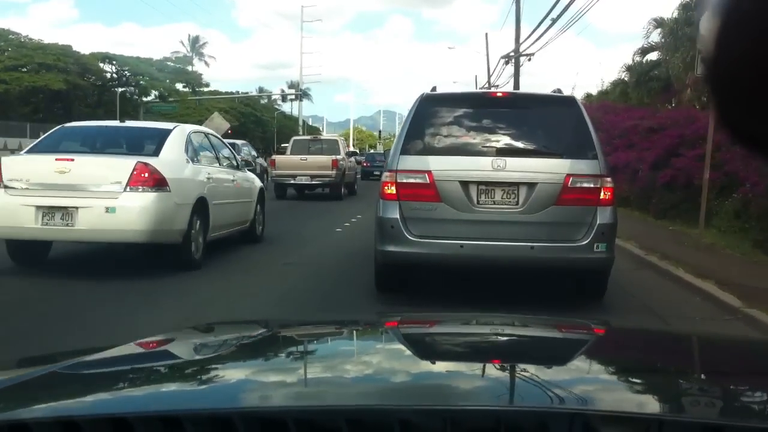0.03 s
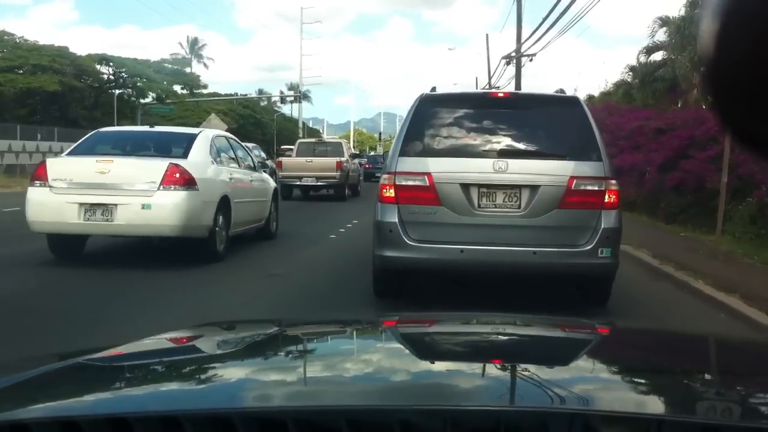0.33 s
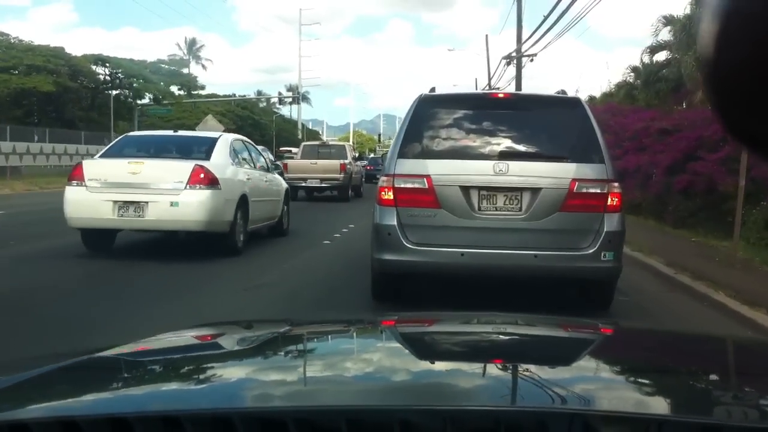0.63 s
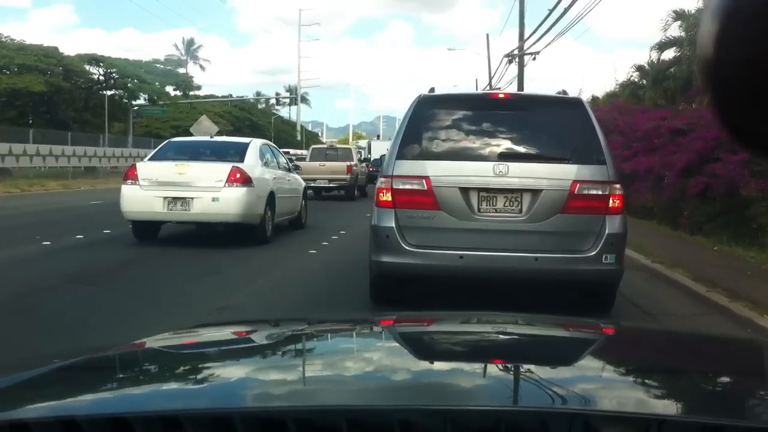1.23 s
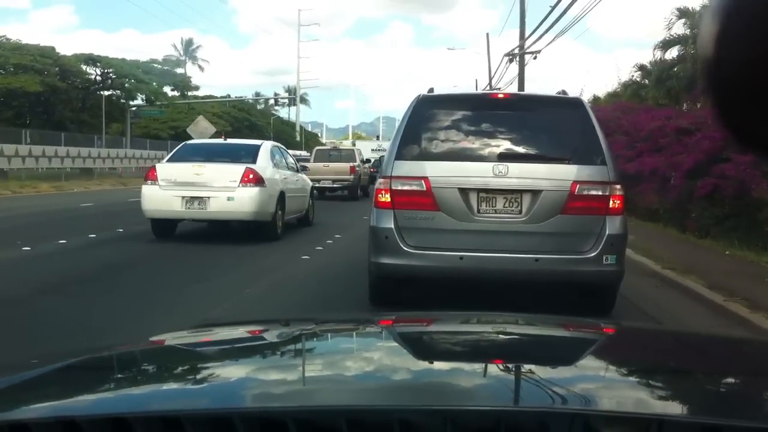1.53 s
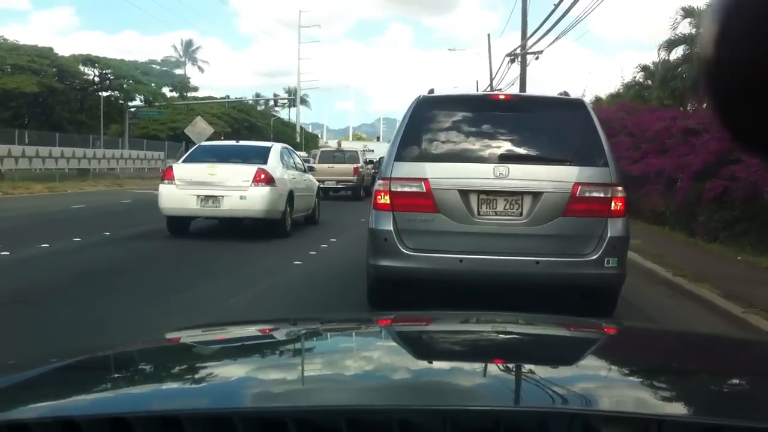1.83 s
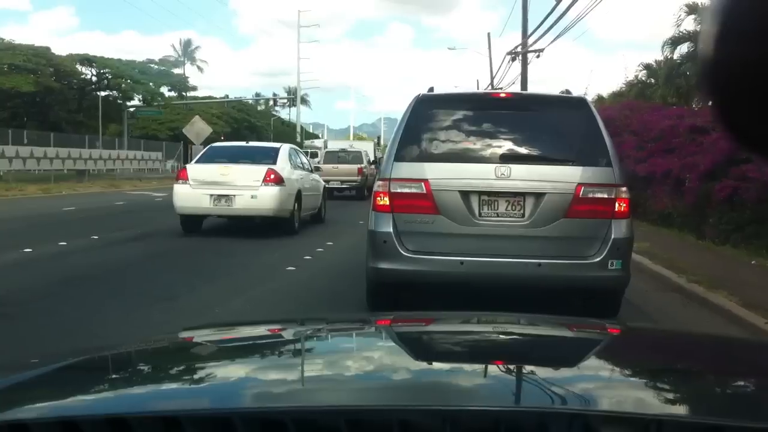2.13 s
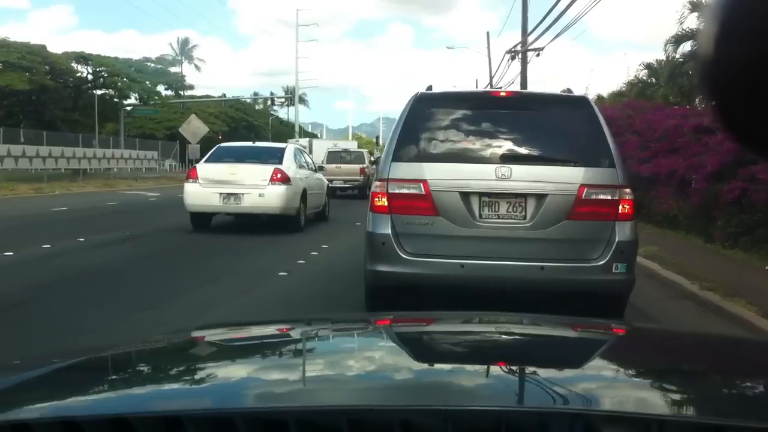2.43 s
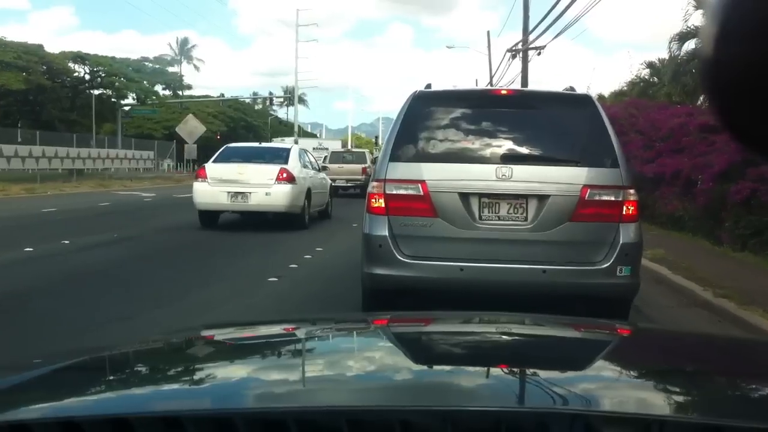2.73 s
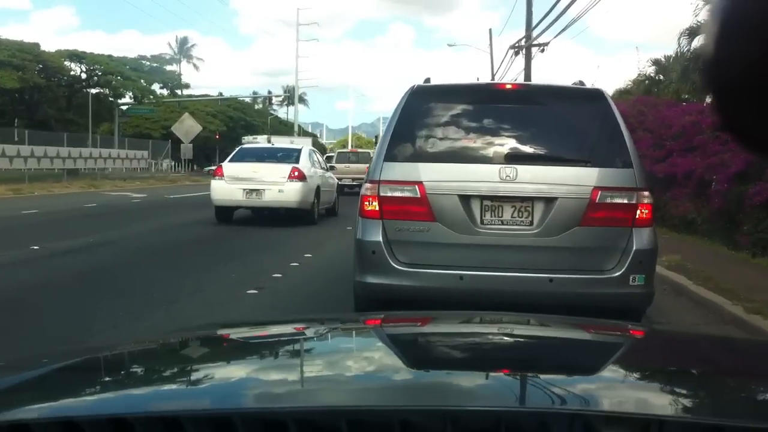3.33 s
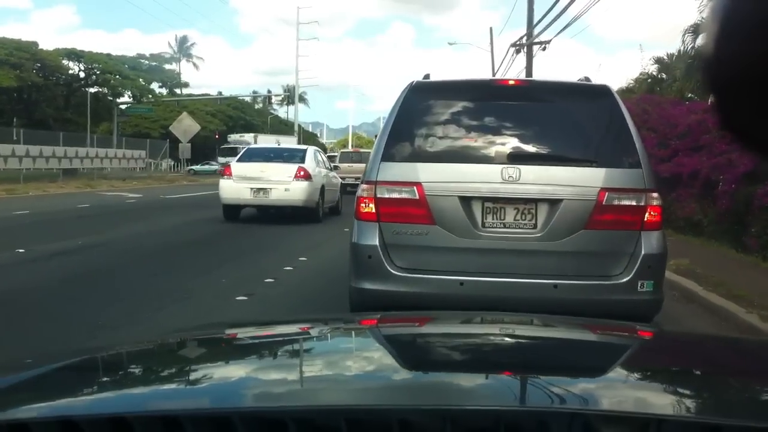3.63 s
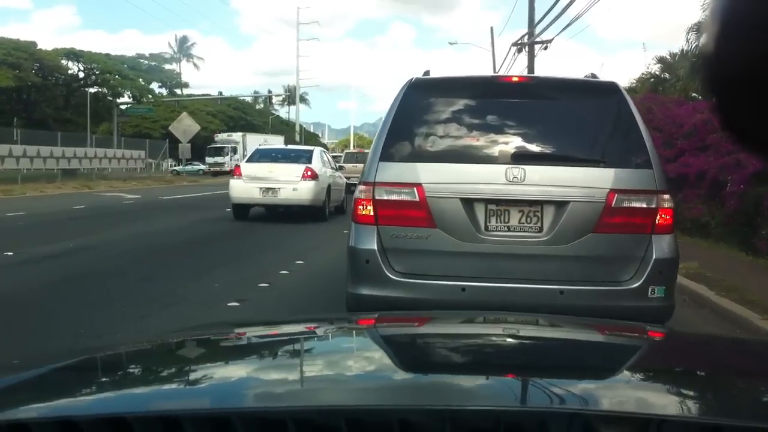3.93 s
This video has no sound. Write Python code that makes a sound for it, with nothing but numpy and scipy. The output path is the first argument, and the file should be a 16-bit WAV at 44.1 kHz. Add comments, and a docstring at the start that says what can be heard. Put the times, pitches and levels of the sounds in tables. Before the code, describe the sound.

Deep, throbbing engine and exhaust rumble inside a creeping car, with a few soft pops.

```python
"""Inside a car in slow traffic, one microphone behind the windscreen, a big eight-cylinder engine creeping.
From the start its uneven exhaust pulses boom in the pipes and cabin, over a low road rumble.
After half a second the throttle is eased and the exhaust pops; just past one second it picks up again.
From two seconds on, tyres outside swell past with thin hiss and a breathy whistle; three more pops follow.
The last second brings two faint brake squeals and most of the small rattles of the trim."""
import sys
import numpy as np
from scipy import signal
from scipy.fft import rfft, irfft
from scipy.io import wavfile
from scipy.ndimage import uniform_filter1d

SR = 44100
rng = np.random.default_rng(int(sys.argv[2]) if len(sys.argv) > 2 else 0)


def store_pcm(level_fs):
    """Save levels as 16-bit WAV."""
    pcm = np.round(np.clip(level_fs, -1, 1) * 32767).astype(np.int16)
    wavfile.write(sys.argv[1], SR, np.atleast_2d(pcm).T)


N = 176400
T = np.arange(N) / SR

# Engine speed. Each row: time in seconds, firings per second.
FIRING_RATE = [(0, 71.3), (.15, 70.7), (.44, 70), (.6, 66.5), (.8, 64.6), (1.0, 52), (1.15, 54.6),
               (1.3, 59), (1.52, 60.3), (1.7, 53.2), (1.88, 54), (2.03, 61.5), (2.25, 60.2), (2.55, 56.6),
               (3.2, 58.5), (3.6, 63), (4, 62.7)]
# How steadily the engine pulls. Each row: time in seconds, clean tone's share of the boom from 0 to 1.
STEADY_PULL = [(0, 0.51), (.3, 0.63), (.5, 0.61), (.62, 0.23), (1.05, 0.01), (1.2, 0.57), (1.5, 0.31),
               (1.62, 0.12), (1.82, 0.55), (2.05, 0.17), (3.0, 0.17), (3.2, 0.33), (4, 0.1)]
# The eight firings of a cycle. Each entry: relative strength in dB.
FIRING_STRENGTH = [2, -2, 2.5, -2, -1, 2.5, 4, -5]
# Their uneven timing. Each entry: lateness in firing intervals.
FIRING_LAG = [0.0019, 0.194, -0.143, 0.121, -0.1954, 0.034, .22, -0.151]
# Hum at the firing rate. Each row: time in seconds, relative level in dB.
HUM_LEVEL = [(0.02, -43.5), (0.6, -33.5), (0.8, -38), (0.85, -51), (1.1, -53), (1.46, -38), (1.64, -54),
             (2.05, -40), (2.09, -50), (2.19, -37), (2.37, -45), (2.39, -54), (2.5, -43), (3.28, -46.5),
             (3.69, -35.5), (3.85, -50), (3.88, -37), (3.98, -49)]
# The exhaust's low boom and the growl above it. Each row: time in seconds, relative level in dB.
BOOM_LEVEL = [(0.02, -19), (0.46, -17), (0.61, -24.5), (0.69, -28.5), (0.71, -17.5), (0.77, -27),
              (0.81, -20.5), (0.95, -28.5), (0.97, -21.5), (1.09, -42), (1.12, -24), (1.27, -18),
              (1.33, -23.5), (1.57, -21), (1.65, -34), (1.68, -21), (1.89, -25.5), (1.93, -19.5),
              (2.08, -26.5), (2.13, -18.5), (2.35, -26.5), (2.48, -19), (2.51, -28), (2.6, -20.5),
              (2.9, -24.5), (2.94, -19), (3.02, -35), (3.05, -15.5), (3.07, -23), (3.21, -19.5),
              (3.23, -24.5), (3.43, -20.5), (3.48, -31), (3.5, -24.5), (3.64, -19.5), (3.69, -26),
              (3.76, -18.5), (3.82, -27), (3.85, -18), (3.98, -22)]
GROWL_LEVEL = [(0.02, -24.5), (0.29, -23.5), (0.68, -29.5), (0.71, -22.5), (0.86, -36), (0.97, -29.5),
               (1.12, -43.5), (1.17, -23), (1.21, -34.5), (1.27, -23.5), (1.68, -31), (1.72, -25),
               (1.84, -35), (2.23, -23.5), (2.25, -30.5), (2.52, -37.5), (2.55, -27), (3.07, -30),
               (3.16, -29), (3.22, -35), (3.25, -25.5), (3.98, -35.5)]
# Bark and rasp rise with the throttle. Each row: time in seconds, bark and rasp in relative dB.
BARK_RASP_LEVEL = [(0.02, -27, -38.5), (0.05, -34, -38), (0.35, -28.5, -29), (0.61, -38, -42),
                   (0.7, -32, -33.5), (1.1, -46, -50.5), (1.21, -37, -37), (1.45, -29, -31.5),
                   (1.62, -40.5, -40.5), (1.86, -41, -46), (1.98, -31, -31), (2.03, -36, -44.5),
                   (2.16, -31.5, -33), (2.39, -38.5, -42.5), (2.58, -27.5, -34.5), (2.62, -35.5, -45),
                   (2.68, -31, -37.5), (2.98, -28, -35), (3.05, -46, -42.5), (3.1, -27, -33.5),
                   (3.35, -37.5, -42.5), (3.44, -27, -30.5), (3.58, -34.5, -48.5), (3.64, -27.5, -33),
                   (3.92, -34, -42), (3.98, -28, -35.5)]
# Resonances of pipes and cabin, low to high. Each row: centre in Hz, width in Hz, relative level in dB.
BOOM_RESONANCES = [(120.4, 60, -9.5), (143.3, 35.5, -0.5), (169, 19, -1.5), (190.3, 33.7, -9)]
GROWL_RESONANCES = [(261.5, 32, -0.68), (288.6, 21.5, -2.3)]
BARK_RESONANCES = [(227.3, 29, 0), (320.4, 28.5, 1.5), (349.8, 44, -5.5), (378.8, 25, -11.5)]
RASP_RESONANCES = [(404.5, 56, -6.5), (447, 38.4, 1), (505.8, 66, -4)]
# Gas noise that passes the muffler. Each row: frequency in Hz, relative level in dB.
GAS_SPECTRUM = [(300, -5), (520, -0.5), (700, 2), (900, -4.5), (1150, -12), (1700, -19.5), (3000, -26),
                (8000, -41)]
# Single harder firings. Each row: start in seconds, peak in dB ahead of the muffler's filtering.
EXHAUST_POPS = [(.709, -9.5), (2.542, -14), (3.087, -14), (3.267, -15)]
# The ring of a pop. Each row: frequency in Hz, relative level in dB, seconds to fall by 60 dB.
POP_RING = [(150, -13, 0.044), (273, -3, 0.093), (346, 1, 0.06), (450, -5.5, 0.037)]
EXHAUST_LOW_HZ, EXHAUST_HIGH_HZ, POP_TOP_HZ = 100, 594, 504

# Traffic outside, heard from within. Each row: time in seconds, tyre roar and hiss in relative dB.
TRAFFIC_LEVEL = [(0.03, -50, -66), (0.15, -50.5, -61.5), (0.81, -50.5, -63), (1.07, -53, -69.5),
                 (1.21, -49, -60), (1.51, -47.5, -57.5), (1.6, -47, -62), (1.61, -50.5, -60.5),
                 (2.13, -46, -53.5), (2.62, -47, -53), (2.7, -43.5, -52.5), (3.23, -44.5, -55),
                 (3.3, -46, -56), (3.45, -42, -54), (3.57, -46.5, -59), (3.62, -42, -52.5),
                 (3.84, -47, -58.5), (3.86, -44, -54.5), (3.94, -48.5, -59), (3.97, -47.5, -56.5)]
# Tyre roar, hiss and road rumble in the cabin. Each row: frequency in Hz, relative level in dB.
ROAR_SPECTRUM = [(300, -12.5), (600, 0), (760, -3), (900, 3.5), (1030, -3), (1200, 1.5), (1400, -3),
                 (1540, -7), (1700, -4.5), (1950, -15), (2100, -10.5), (2300, -18), (2420, -13),
                 (2550, -24.5), (2670, -18), (3300, -24.5), (6000, -52.5)]
HISS_SPECTRUM = [(1200, -1.5), (2600, 0.5), (3600, -.5), (5200, -0.5), (6300, -3), (7400, -2.5), (8400, -5),
                 (10000, -4), (12000, -7), (14000, -11.5), (15800, -20)]
RUMBLE_SPECTRUM = [(15, -17), (30, -23), (42, -25), (60, 13), (90, 7.5), (200, 1.5), (500, -4),
                   (900, -34.5)]
# The singing of passing tread. Each row: time in seconds, centre in Hz, level in dB against the roar.
TREAD_BAND = [(0, 900.2, -10.5), (.8, 1000, -11), (1.35, 1189, -5.5), (2.3, 1230, -4.5), (2.7, 1050, -6),
              (3.0, 933.5, -6.5), (3.5, 944.6, -8), (4, 958, -14)]
# A thin whistle high in the hiss. Each row: time in seconds, relative level in dB.
WHISTLE_LEVEL = [(0, -104), (1.6, -90), (2.1, -64), (2.6, -62), (2.95, -59.5), (3.25, -63), (3.45, -74),
                 (3.6, -82), (4, -88)]
# Its two bands. Each row: centre in Hz, width in Hz, relative level in dB.
WHISTLE_BANDS = [(14560, 300, -3), (12700, 850, -4.5)]
# Faint brakes. Each row: start in seconds, end in seconds, pitch in Hz, average level in dB.
BRAKE_SQUEALS = [(3.139, 3.28, 14580, -64), (3.63, 3.78, 6625, -65)]
# Trim in the cabin, near the microphone. Each row: middle in seconds, length in seconds, level in dB.
TRIM_RATTLES = [(0.138, 0.032, -60), (0.793, .025, -64), (1.157, 0.017, -60), (1.24, 0.045, -60),
                (3.178, .03, -55.5), (3.345, 0.027, -59), (3.438, 0.043, -53.5), (3.51, 0.037, -54),
                (3.62, 0.023, -54), (3.692, 0.055, -53.5), (3.775, .025, -59), (3.968, 0.034, -56)]


def engine():
    """Lumpy exhaust in four registers, with clean tones at one, two and four times the firing rate."""
    rate, hum_db, boom_db, steady = in_time(FIRING_RATE, HUM_LEVEL, BOOM_LEVEL, STEADY_PULL)
    glide = int(.035 * SR) + 1
    growl_db, bark_db, rasp_db = uniform_filter1d(in_time(GROWL_LEVEL, BARK_RASP_LEVEL), glide)
    count = np.cumsum(rate) / SR
    drive = firings(count, steady)
    hum, second, fourth = (np.sqrt(2) * np.sin(2 * np.pi * (k * count + rng.random())) for k in (1, 2, 4))
    boom = np.sqrt(1 - steady) * pipe(drive, BOOM_RESONANCES) + np.sqrt(steady) * second
    boom = evened(boom, span_s=.065)
    growl = pipe(drive, GROWL_RESONANCES) + from_db(-13) * steady * resonate(fourth, 282, width_hz=70.4)
    bark = pipe(drive, BARK_RESONANCES)
    rasp = pipe(drive, RASP_RESONANCES) + from_db(-16) * coloured_noise(GAS_SPECTRUM)
    return (from_db(hum_db + .5) * hum + from_db(boom_db + 1.5) * boom + from_db(growl_db + .5) * growl
            + from_db(bark_db + 2.5) * bark + from_db(rasp_db - .5) * rasp)


def firings(count, steady):
    """One uneven pulse per cylinder, then a puff of turbulent gas; more regular under a steady pull."""
    firing = np.arange(int(count[-1]))
    cylinder = firing % len(FIRING_STRENGTH)
    looseness = 1 - .54 * steady
    jitter, misfire = rng.standard_normal((400, 2))[firing].T * np.interp(firing, count, looseness)
    start_s = np.interp(firing + np.array(FIRING_LAG)[cylinder], count, T) + .000866 * jitter
    strength = from_db(np.array(FIRING_STRENGTH)[cylinder] + 3.5 * misfire)
    pulses = np.zeros(N)
    pulses[np.clip((start_s * SR).astype(int), 0, N - 1)] = strength
    puffs = rng.standard_normal(N) * np.exp(1.83 * np.cos(2 * np.pi * count - 1))
    return rms_one(pulses) + .57 * looseness * rms_one(puffs)


def pipe(drive, resonances):
    """Pulses ring a group of resonances behind the muffler, at an even level."""
    run_in = SR // 4   # the pipes are already ringing at the start
    drive = np.concatenate([drive[run_in:2 * run_in], drive])
    ring = sum((-1) ** k * from_db(db) * resonate(drive, hz, width)
               for k, (hz, width, db) in enumerate(resonances))
    muffled = cut(cut(ring, EXHAUST_LOW_HZ, "high", order=6), EXHAUST_HIGH_HZ, "low", order=8)
    return evened(muffled, span_s=.13)[run_in:]


def exhaust_pops():
    """Now and then one firing hits harder and rings briefly through the muffler."""
    pops = np.zeros(N)
    for start, peak_db in EXHAUST_POPS:
        age = np.maximum(T - start, 0)
        ring = sum(from_db(db - np.minimum(60 * age / t60, 200)) * np.sin(2 * np.pi * hz * age)
                   for hz, db, t60 in POP_RING)
        pops += from_db(peak_db) * ring / np.abs(ring).max()
    return cut(cut(pops, EXHAUST_LOW_HZ, "high", order=4), POP_TOP_HZ, "low", order=8)


def road():
    """Tyres roar past outside over the road rumble; their hiss throbs slightly with the engine."""
    roar_db, hiss_db, rate = in_time(TRAFFIC_LEVEL, FIRING_RATE)
    throb = 1 + .14 * np.cos(2 * np.pi * np.cumsum(rate) / SR)
    roar = from_db(roar_db - 1.5 + 1.13 * drift(25.22)) * (coloured_noise(ROAR_SPECTRUM) + tread())
    hiss = from_db(hiss_db - .08 + 1.13 * drift(29.99)) * coloured_noise(HISS_SPECTRUM) * throb
    rumble = from_db(-45) * coloured_noise(RUMBLE_SPECTRUM)
    return roar + hiss + rumble


def tread(width_hz=283):
    """Tyre tread sings in a broad band of noise that rises, then sinks as the tyres go by."""
    hz, db = in_time(TREAD_BAND)
    phase = 2 * np.pi * np.cumsum(hz) / SR
    a, b = cut(rng.standard_normal((2, N)), width_hz / 2, "low", order=2)
    return from_db(db) * rms_one(a * np.cos(phase) + b * np.sin(phase))


def whistle():
    """Two high bands of noise make a breathy whistle that swells with the traffic."""
    level_db, = in_time(WHISTLE_LEVEL)
    return sum(from_db(level_db + db) * resonate(rng.standard_normal(N), hz, width)
               for hz, width, db in WHISTLE_BANDS)


def brakes(fade_s=.04, waver_hz=45, flicker_db=4):
    """Brakes squeal briefly, each a thin tone that wavers in pitch and level."""
    squeals = np.zeros(N)
    for start, end, hz, db in BRAKE_SQUEALS:
        fade = np.clip(np.minimum(T - start, end - T) / fade_s, 0, 1)
        tone = np.sqrt(2) * np.sin(2 * np.pi * np.cumsum(hz + waver_hz * drift(150)) / SR)
        squeals += from_db(db + flicker_db * drift(60)) * fade * tone
    return squeals


def trim_rattles(contacts_per_s=3800, band_hz=(2600, 9100)):
    """The trim rattles in short, bright clusters of tiny contacts."""
    level = sum(from_db(db) * np.exp(-(2 * (T - middle) / length) ** 2)
                for middle, length, db in TRIM_RATTLES)
    contacts = rng.standard_normal(N) * (rng.random(N) < contacts_per_s / SR)
    return level * rms_one(cut(contacts + 1e-18, band_hz, "band", order=1))


def from_db(db):
    """Decibels to gain."""
    return 10 ** (np.asarray(db) / 20)


def rms_one(x):
    """Scale to unit rms."""
    return x / np.sqrt(np.mean(x ** 2) + 1e-20)


def evened(x, span_s):
    """Ride the gain to hold the slow level at 1."""
    power = uniform_filter1d(x ** 2, int(span_s * SR))
    return x / np.sqrt(np.abs(uniform_filter1d(power, int(span_s * SR / 2))) + 1e-12)


def in_time(*tables):
    """Every value column of the given time tables, sample by sample."""
    return [np.interp(T, times, column)
            for times, *columns in map(np.transpose, tables) for column in columns]


def drift(turns_per_s):
    """Random wander around zero, of size about 1."""
    knots = rng.standard_normal(1000)
    return np.interp(T * turns_per_s, np.arange(len(knots)), knots)


def coloured_noise(spectrum):
    """Noise with the given spectrum, rms 1."""
    hz, db = np.transpose(spectrum)
    bins_hz = np.maximum(np.fft.rfftfreq(N, 1 / SR), 1)
    gain = from_db(np.interp(np.log(bins_hz), np.log(hz), db))
    return rms_one(irfft(rfft(rng.standard_normal(N)) * gain, N))


def resonate(x, hz, width_hz):
    """A steep-sided resonance (two alike in series), rms 1."""
    r = np.exp(-np.pi * width_hz / SR)
    section = [1 - r, 0, r - 1, 1, -2 * r * np.cos(2 * np.pi * hz / SR), r * r]
    return rms_one(signal.sosfilt([section, section], x + 1e-18))


def cut(x, hz, kind, order):
    """Butterworth filter."""
    return signal.sosfilt(signal.butter(order, hz, kind, fs=SR, output="sos"), x)


def scene():
    """Everything as it reaches one microphone behind the windscreen."""
    return (engine() + exhaust_pops() + road() + whistle() + brakes() + trim_rattles())[None]


def record(dry):
    """The microphone's signal is cut steeply above 15750 Hz."""
    return signal.sosfilt(signal.ellip(12, .1, 80, 15750, fs=SR, output="sos"), dry)


dry = scene()
out = record(dry)
store_pcm(out)
```